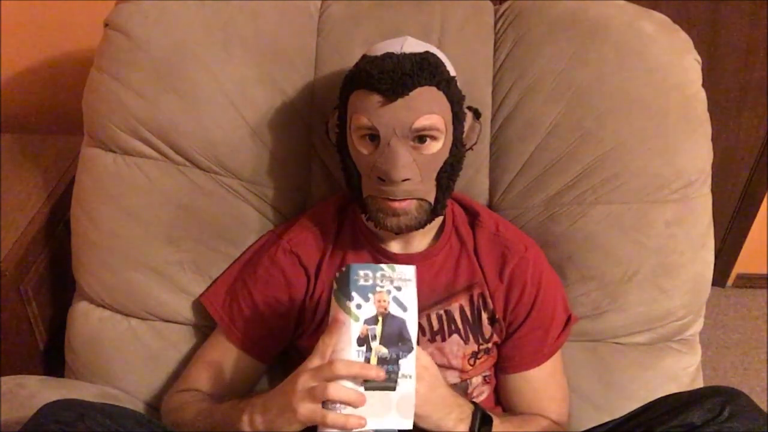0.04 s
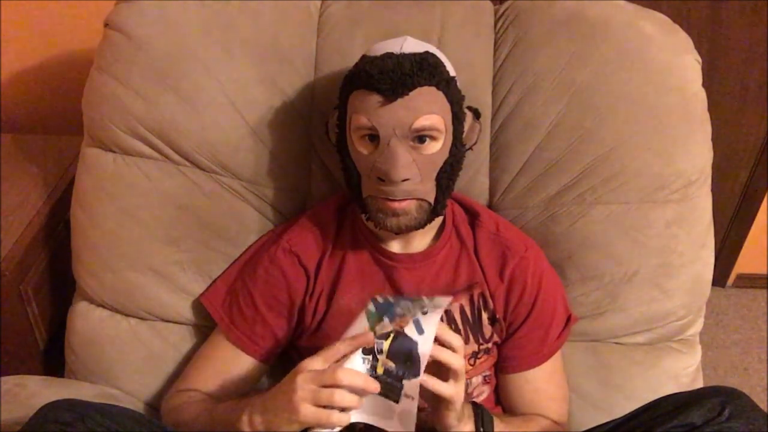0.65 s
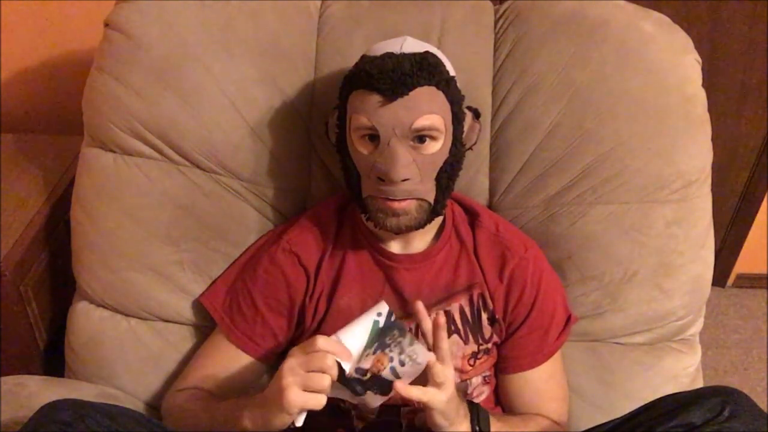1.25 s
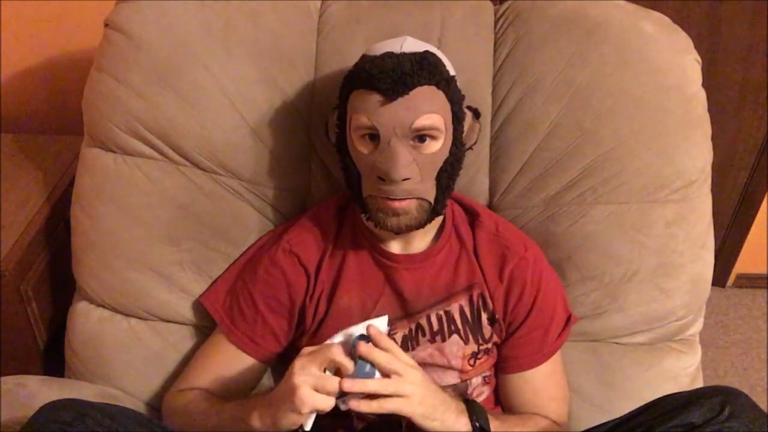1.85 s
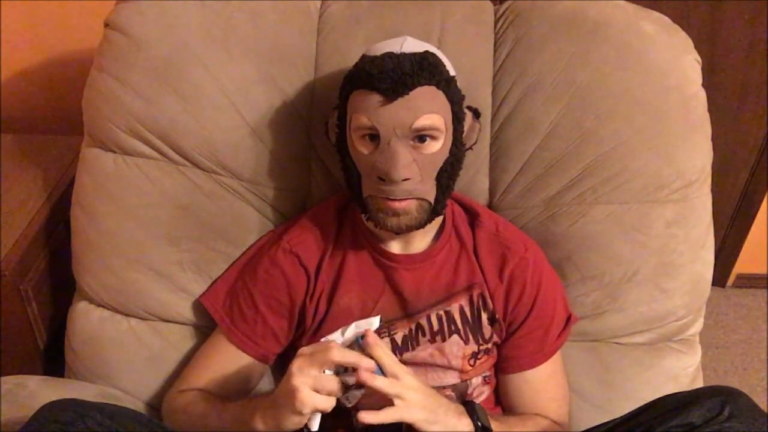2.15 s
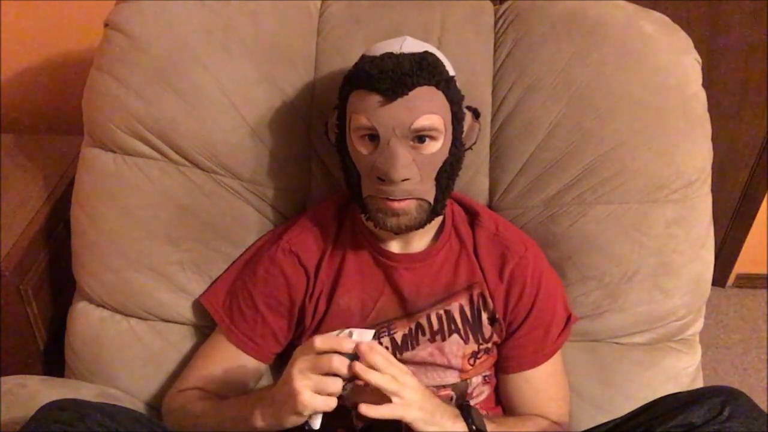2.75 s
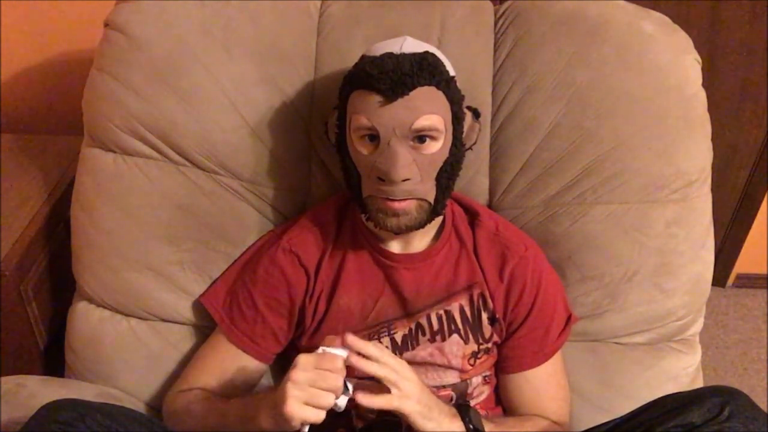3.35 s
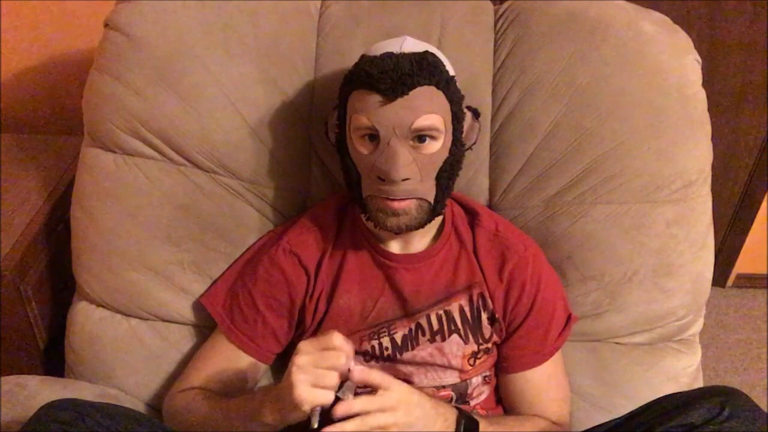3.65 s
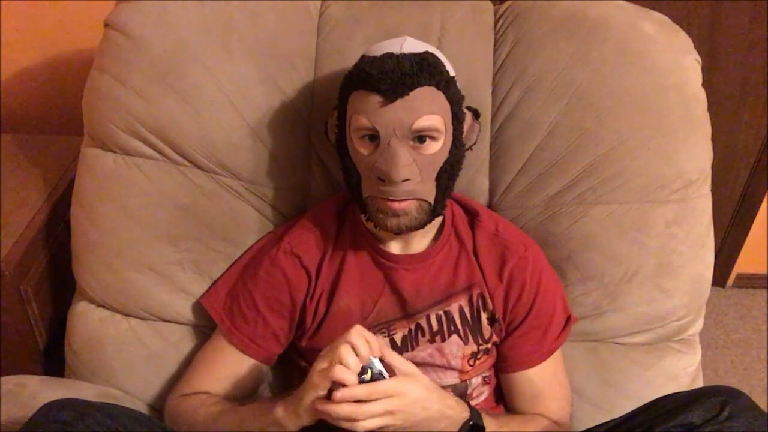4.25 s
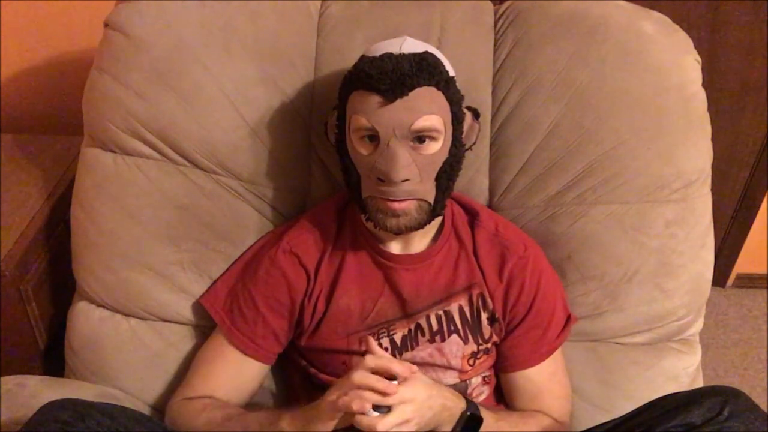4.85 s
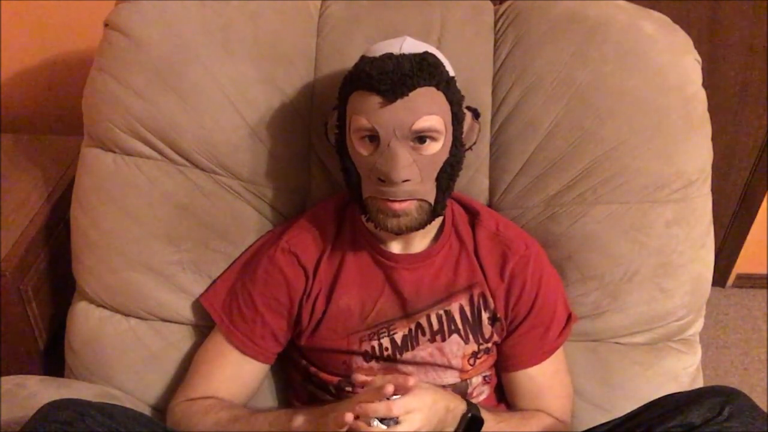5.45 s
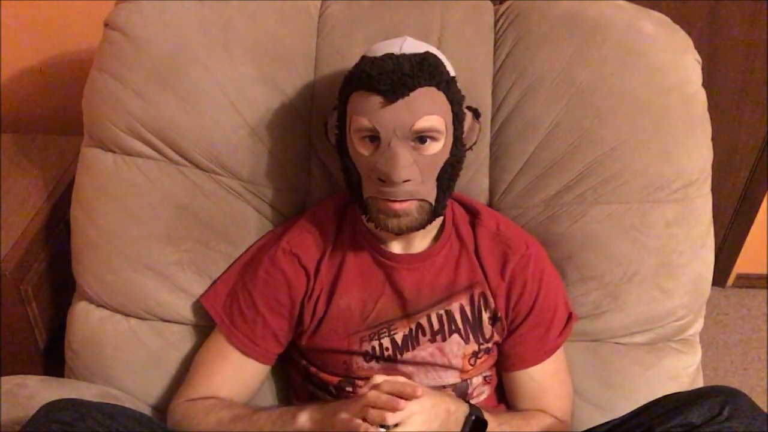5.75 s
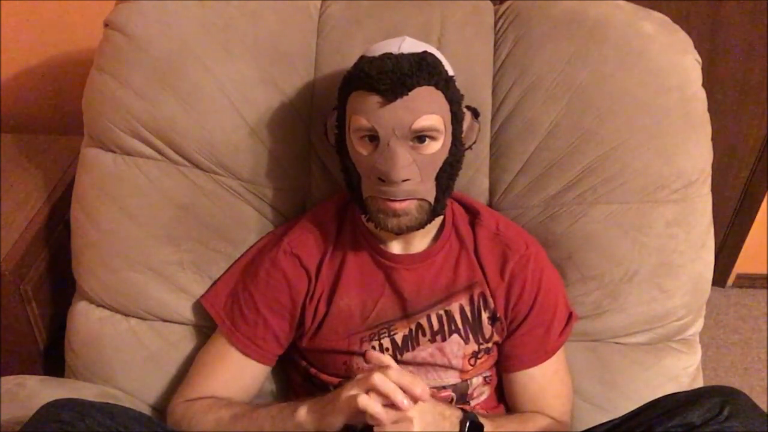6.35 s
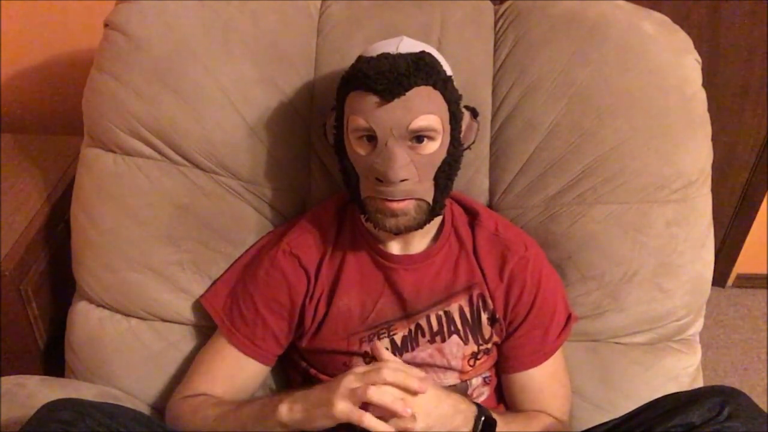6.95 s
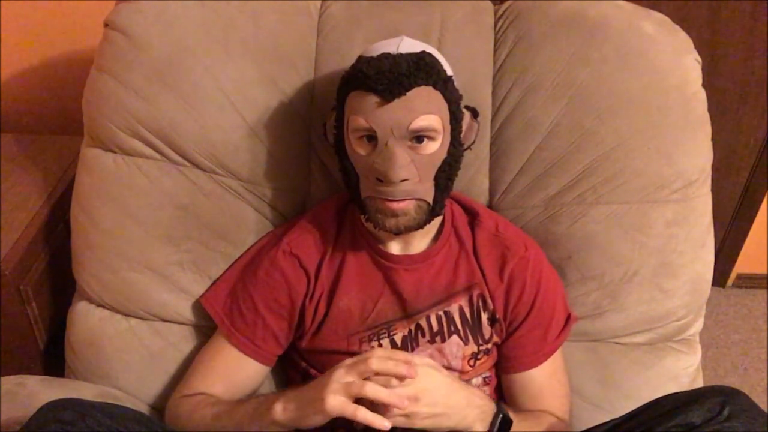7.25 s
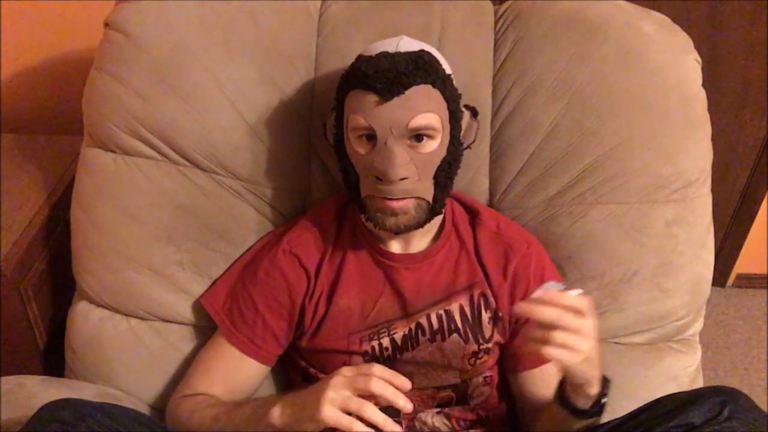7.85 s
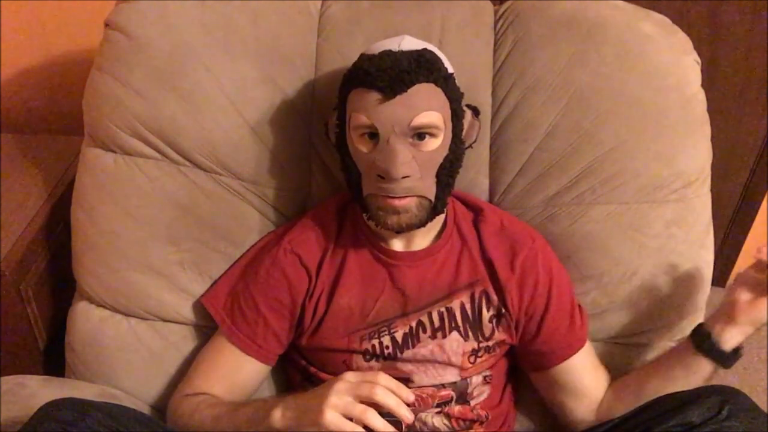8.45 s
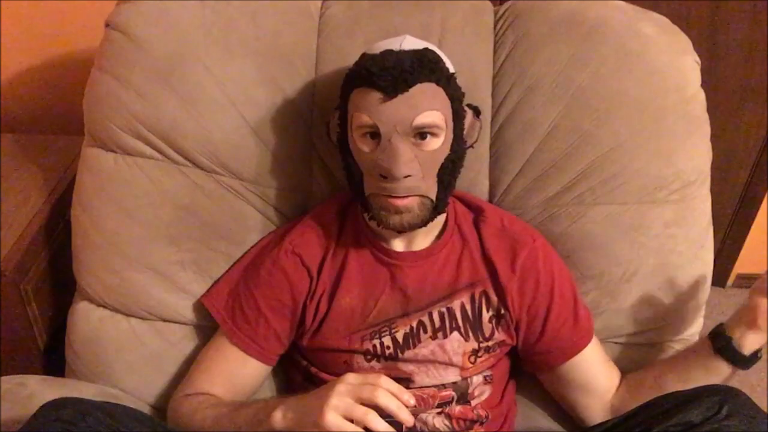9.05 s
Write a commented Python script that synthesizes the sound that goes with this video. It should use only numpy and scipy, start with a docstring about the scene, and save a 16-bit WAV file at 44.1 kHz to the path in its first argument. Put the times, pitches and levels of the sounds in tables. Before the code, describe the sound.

Hands start folding a stiff paper leaflet close by in a small, quiet room, with a few light snaps and soft rubbing in the first second. From about 1 to 3 seconds the crumpling is densest and loudest: sharp, irregular cracks, small low pops, scrapes and crinkling rustle, arriving squeeze after squeeze. The sound grows thinner as the wad tightens, easing around 4 seconds, with another cluster of crisp snaps and dry creaks from 4.5 to 5.7 seconds. From 6 to 7.5 seconds there are only faint squeezes and ticks, followed by a few barely audible paper touches. At about 9 seconds the tossed ball lands on furniture with a short, hollow knock and a slight crunch. Faint room air and a low electrical hum continue throughout, with a few very soft thuds of someone shifting in a seat.

```python
"""In a small living room, hands fold a stiff paper leaflet and crush it into a ball.
Squeeze after squeeze, creases snap and ring the flat patches beside them, and the paper scrapes
and rustles. As the wad tightens it loses its low notes and creaks. The ball is tossed aside and
lands on furniture with a hollow knock. Under it all lie room air, a faint mains hum and a few
soft thuds as the seated person shifts."""
import sys
import numpy as np
from scipy import signal
from scipy.fft import rfft, irfft, next_fast_len
from scipy.io import wavfile
from scipy.ndimage import uniform_filter1d, map_coordinates

SR = 44100
rng = np.random.default_rng(int(sys.argv[2]) if len(sys.argv) > 2 else 0)


def persist_wave(psi):
    """Save psi, clipped to +-1, as 16-bit WAV."""
    counts = np.round(np.clip(psi, -1, 1) * 32767).astype(np.int16)
    wavfile.write(sys.argv[1], SR, np.atleast_2d(counts).T)


N = 406161

# creases giving way: start_s, level_db, wide_patch_hz, narrow_patch_hz, bass_db, treble_db, ring_s
CREASE_SNAPS = [(0.109, -46.0, 690, 1560, 15, -23, 0.1), (0.2491, -39.5, 816, 1230, 1, -15, 0.059),
                (0.2746, -42.5, 990, 1263, -7, -29, 0.022), (0.461, -44.5, 1660, 2040, 17, 6, 0.036),
                (0.7842, -34, 1440, 2670, 11.5, 11, 0.029), (0.8737, -41.5, 1210, 3850, 9.5, -20, 0.049),
                (1.122, -28.0, 1070, 1240, -7, 10.5, 0.0077), (1.1843, -33.5, 1350, 1900, 1, 0, 0.03),
                (1.23, -35.5, 905, 1330, -5, 13, 0.0066), (1.2446, -27, 527, 1410, -1.5, 4, 0.031),
                (1.2482, -31.5, 3850, 6900, -0.5, 1, 0.026), (1.287, -43.5, 1400, 1930, -12, 16, 0.022),
                (1.3553, -36, 1426, 4350, -4, -9, 0.009), (1.418, -45.5, 1480, 2640, -3, 0, 0.0087),
                (1.4371, -30.5, 3820, 4970, 5, 17.5, 0.0068), (1.459, -41.5, 1560, 2600, 4, 10, 0.011),
                (1.4728, -36.5, 1240, 2200, -8, -26, 0.0038), (1.5647, -41.0, 576, 2120, 0, -7, 0.041),
                (1.7441, -36, 2290, 2930, 19.5, -4, 0.03), (1.7724, -41, 880, 2810, 9, -7, 0.014),
                (1.7936, -38, 2940, 3500, -13, 4, 0.015), (1.8178, -37.5, 2660, 5700, 0, 16, 0.013),
                (1.8504, -28.5, 650, 2940, -4.5, 4, 0.0048), (1.9642, -37.5, 970, 1200, 1, 2, 0.013),
                (1.9814, -32, 1820, 2650, 19.5, 13.5, 0.019), (2.0545, -37, 2780, 3800, -18, -2, 0.013),
                (2.159, -33, 665, 1210, -15, 0.5, 0.01), (2.3251, -37.5, 1460, 2180, 9, 15, 0.038),
                (2.5298, -34, 3750, 5440, -22, 12, 0.0075), (2.7573, -36.5, 764, 980, -3, 0, 0.014),
                (3.0028, -41, 1180, 1270, -16, -26, 0.029), (3.1848, -38.5, 1460, 1560, -14, 5.5, 0.013),
                (3.3597, -39, 1600, 2340, -4, -4, 0.019), (3.4844, -40, 4200, 4200, -17, -1, 0.014),
                (3.5488, -47.5, 1040, 1400, -9, -30, 0.0062), (3.722, -47.5, 1490, 3860, -2, 4, 0.041),
                (4.0112, -49, 824, 4280, -1, 11, 0.082), (4.114, -47, 586, 1090, 5, 10, 0.08),
                (4.3185, -50.5, 1240, 2960, 16, 18, 0.004), (4.5179, -32.5, 776, 1200, 0, 3, 0.015),
                (4.701, -30, 1040, 3080, 0, 4, 0.0028), (4.789, -43.5, 2400, 3020, -21, 16, 0.024),
                (4.814, -39.5, 1470, 2160, -40, -3, 0.093), (4.895, -45, 1560, 4320, -8, -7, 0.0081),
                (5.019, -38, 1060, 1560, -14, 3.5, 0.034), (5.095, -37.5, 1240, 1620, -1.5, 2, 0.014),
                (5.45, -47.5, 565, 3180, -7, -13, 0.0095), (5.6117, -40, 3370, 7140, -11.5, -10, 0.0088),
                (6.0585, -58.5, 1940, 3640, -12, -14, 0.01), (6.299, -61, 2240, 3880, 10, 5, 0.03),
                (7.055, -55, 1020, 1820, -11, 14, 0.011), (7.38, -58, 1060, 1730, -7.5, -33, 0.017),
                (8.1804, -59.5, 1940, 3220, 2, 2.5, 0.012)]
# the tone of the sheet when it snaps or ticks: pitch_hz, level_db
SHEET_TONE = [(80, -30.5), (150, -30.5), (250, -24), (450, -13.5), (630, -9), (800, -13), (1130, -6.5),
              (1600, -3), (2860, -7), (4540, -11.5), (6440, -16), (10240, -31.5), (14500, -40)]
# the tone of rubbed paper: pitch_hz, level_db
RUB_TONE = [(88, -41.5), (170, -17.5), (361, -10.5), (494, -11), (624, -6.5), (830, -7), (1450, -6),
            (1940, -8), (4200, -7.5), (4950, -12.5), (6000, -12.5), (10200, -29), (13700, -30),
            (16000, -39.5)]


def snaps(patch_db=8.5, patch_octaves=0.18, flip_s=0.0011, click_db=-3, aftershock_db=-12):
    """A crease flips in a quick stutter, and the two flat patches beside it ring briefly."""
    out, t = np.zeros(N), np.arange(SR // 12) / SR
    for start_s, level_db, wide_hz, narrow_hz, bass_db, treble_db, ring_s in CREASE_SNAPS:
        fade = amp(-60 * np.maximum(t - flip_s, 0) / max(ring_s, .004))
        # waves scatter between the creases and fill every pitch about evenly
        spectrum = rfft(fade * rng.standard_normal(len(t)))
        burst = irfft(spectrum / abs(spectrum + 1e-9) ** .5, len(t)) * fade ** .25
        peaks = uneven_peaks()

        def tone_db(hz):
            patches = bump(hz, wide_hz, patch_octaves) + bump(hz, narrow_hz, patch_octaves)
            bass = (1 - above(hz, 1100)) * above(hz, 190)
            sheet = along(SHEET_TONE, hz) + along(peaks, hz)
            return sheet + patch_db * patches + bass_db * bass + treble_db * treble(hz)

        # the shorter the snap, the more of it is one clean click
        click = amp(click_db) * np.linalg.norm(burst) * min(1, 0.0042 / ring_s)
        burst[round(flip_s * SR / 2)] += click
        burst += amp(aftershock_db) * np.linalg.norm(burst) * aftershocks(t)
        snap = coloured(burst, tone_db)
        add(out, start_s, amp(level_db) * snap * np.sqrt(SR // 100) / np.linalg.norm(snap))
    return out


def aftershocks(t, count=7):
    """Smaller cracks follow a snap as the sheet settles."""
    age_s = t - rng.uniform(.007, .05, (count, 1))
    cracks = rng.uniform(.3, 1, (count, 1)) * (age_s > 0) * np.exp(-abs(age_s) / .0007)
    run = cracks.sum(0) * rng.standard_normal(len(t))
    return run / np.linalg.norm(run)


def pops(pop_db=-19, pop_hz=215, ring_s=0.065):
    """While the sheet is still flat, a snap with low notes flips a wide panel with a low pop."""
    out, t = np.zeros(N), np.arange(SR // 8) / SR
    flat = 1 - tightness()
    for start_s, level_db, _, _, bass_db, *_ in CREASE_SNAPS:
        flap = amp(-60 * t / ring_s) * rng.standard_normal(len(t))
        pop = coloured(flap, lambda hz: 40 * np.log10(bump(hz, pop_hz, .8)))
        gain = amp(level_db + pop_db + min(bass_db, 0)) * flat[round(start_s * SR)] ** 3
        add(out, start_s, gain * pop * np.sqrt(SR // 100) / np.linalg.norm(pop))
    return out


def rustle(bend_db=-8, middle_db=-1, hiss_db=2.5, gloss_db=-11, buckle_db=-70):
    """Rubbed paper crinkles; its wide glossy panels bend and hiss until they are wadded up."""
    rub_level, hiss_level = hand_effort()
    flat = (1 - tightness()) ** .45
    # a flat sheet or a light touch slides smoothly; a creased one under pressure crinkles and catches
    force = np.clip(np.log10(rub_level / amp(buckle_db)) * 2, .15, 1)
    rough = force * np.interp(tightness(), [0, 1], [.45, .95])
    grains = crinkle() * rough * .65
    grip = amp((.4 + rough) * wobble(30)) * (1 + rough ** 2 * catches() / 2)

    def rubbed(grit, band):
        friction = (grit + rng.standard_normal(N)) * grip
        return unit(filtered(friction, lambda hz: amp(along(RUB_TONE, hz)) * band(hz)))

    bend = rubbed(grains, lambda hz: (1 - above(hz, 700)) ** 2)
    middle = rubbed(grains, lambda hz: above(hz, 850) - above(hz, 3500))
    hiss = rubbed(grains / 2 + rough * fibre_cracks() / 4, lambda hz: above(hz, 3500))
    gloss = rubbed(fibre_cracks() / 4, lambda hz: above(hz, 11000) ** 2)
    lows = amp(bend_db) * flat * bend + amp(middle_db) * middle
    highs = amp(hiss_db) * hiss + amp(gloss_db) * flat * gloss
    return panel_ring(rub_level * lows + hiss_level * highs)


def hand_effort(light_hiss_db=-7):
    """Light rubbing and squeezes add up to two loudness curves: the rustle and its hiss."""
    # the fingers never quite leave the paper: time_s, level_db
    light_rubbing = [(0, -60), (0.1, -61), (0.45, -54), (0.95, -56), (1.098, -54), (1.6, -53), (2.25, -58),
                     (2.389, -63.5), (2.499, -51), (2.72, -61.5), (3.951, -60.5), (4.4, -55.5),
                     (5.15, -62.5), (5.38, -65.5), (5.75, -67), (6.0, -74), (6.7, -76), (8.9, -76.5)]
    # separate squeezes of the hands: start_s, length_s, level_db, extra_hiss_db
    squeezes = [(0.467, 0.26, -55, -1.5), (0.787, 0.03, -52, -12), (0.965, 0.14, -62.5, 2.5),
                (1.109, 0.19, -50.5, -2.5), (1.396, 0.039, -56, -3), (1.709, 0.29, -50.5, -6.5),
                (2.043, 0.33, -54, -6.5), (2.509, 0.14, -52, -1.5), (2.732, 0.26, -54, -10.5),
                (2.981, 0.23, -49, -7), (3.38, 0.21, -64.5, -3), (3.688, 0.055, -62.5, 0.5),
                (4.357, 0.044, -48.5, -13), (4.526, 0.1, -52, -9.5), (4.674, 0.049, -53.5, -16),
                (4.774, 0.11, -61, 3.5), (4.989, 0.15, -55, -9), (5.417, 0.071, -59.5, -10),
                (5.598, 0.064, -60.5, -19), (5.69, 0.14, -62.5, -24), (6.024, 0.14, -69, -10),
                (6.163, 0.28, -71.5, -11), (6.869, 0.11, -69, -4), (6.991, 0.07, -60.5, -7.5),
                (7.092, 0.13, -65, -7.5), (7.266, 0.099, -64, -8.5), (8.147, 0.16, -80.5, 0),
                (8.572, 0.035, -71, -1.5)]
    rub_db = np.interp(np.arange(N) / SR, *np.transpose(light_rubbing))
    rub_power, hiss_power = amp(rub_db) ** 2, amp(rub_db + light_hiss_db) ** 2
    for start_s, length_s, level_db, extra_hiss_db in squeezes:
        power = squeeze(start_s, length_s)
        rub_power += amp(level_db) ** 2 * power
        hiss_power += amp(level_db + extra_hiss_db) ** 2 * power
    return np.sqrt(rub_power), np.sqrt(hiss_power)


def squeeze(start_s, length_s, grip_s=0.016, swell_db=0.5, release_db_per_s=233):
    """The power of one squeeze over time: take hold, press a little harder, let go."""
    t = np.arange(N) / SR - start_s
    press_db = swell_db * (np.clip(t / max(length_s, .01), 0, 1) - .5)
    release_db = release_db_per_s * np.maximum(t - length_s, 0)
    return (np.clip(t / grip_s, 0, 1) * amp(press_db - release_db)) ** 2


def crinkle(count=5200, fade_s=.0009):
    """Thousands of tiny buckles each ring at their own pitch, part tone and part splintering noise."""
    t = np.arange(SR // 150) / SR
    starts = rng.integers(0, N, (count, 1))
    pitch_hz = np.clip(2200 * np.exp(.7 * rng.standard_normal((count, 1))), 500, 12000)
    size = amp(4.3 * np.minimum(rng.exponential(size=(count, 1)), 3))
    rings = np.sin(2 * np.pi * pitch_hz * t) + rng.standard_normal((count, len(t)))
    return scattered(starts, size * np.exp(-t / fade_s) * rings)


def fibre_cracks(count=260, fade_s=.0006):
    """Single fibres break now and then with a bright crack."""
    t = np.arange(SR // 300) / SR
    starts = rng.integers(0, N, (count, 1))
    fades = rng.uniform(.4, 1, (count, 1)) * np.exp(-t / fade_s)
    return scattered(starts, fades * rng.standard_normal((count, len(t))))


def catches(count=170, rise_s=.0025):
    """The paper catches and slips free, so the loudness jumps for a few milliseconds at a time."""
    age = np.arange(SR // 30) / SR / rise_s
    jumps = np.bincount(rng.integers(0, N, count), rng.uniform(.2, 1, count), N)
    return signal.fftconvolve(jumps, age * np.exp(1 - age))[:N]


def panel_ring(sound, peak_db=6, level_db=-3):
    """The rubbed panel of paper rings at a pitch that moves with the grip."""
    # the main ring of the panel under the fingers: time_s, pitch_hz
    panel_pitch = [(0.3, 1130), (0.62, 2440), (1.0, 2370), (1.35, 1490), (1.85, 2540), (2.25, 2460),
                   (2.62, 1440), (2.85, 2570), (3.1, 1510), (3.58, 1590), (4.05, 5430), (4.3, 1280),
                   (4.55, 2360), (4.84, 3060), (5.02, 1750), (6.2, 2060), (7.05, 1660)]
    hz, t, spectra = signal.stft(sound, SR, nperseg=256)
    ring = bump(hz[:, None], np.interp(t, *np.transpose(panel_pitch)), octaves=.22)
    return signal.istft(spectra * amp(level_db + peak_db * ring), SR, nperseg=256)[1][:N]


def scrapes(ring_db=7):
    """A fold lets go and slides in a short run of tiny slips."""
    # paper sliding on paper: start_s, level_db, pitch_hz, treble_db, length_s
    slides = [(0.152, -56, 1960, 3.5, 0.026), (0.25, -42, 1140, -23.5, 0.036),
              (0.842, -47, 1250, 0.5, 0.036), (1.096, -38.5, 2600, 3.5, 0.0072),
              (1.251, -42, 1850, 5.5, 0.028), (1.857, -35, 2990, 32.5, 0.0091),
              (2.266, -44.5, 2540, 12, 0.033), (2.333, -42.5, 2660, 12, 0.023),
              (3.451, -50, 5600, 10.5, 0.014), (3.804, -43, 2250, 7, 0.04),
              (4.276, -56.5, 4470, 12.5, 0.006), (4.406, -46, 2050, 10.5, 0.018),
              (4.472, -52, 1640, 7.5, 0.0081), (4.803, -40.5, 2920, 7, 0.0098),
              (6.098, -61.5, 2070, 3, 0.053), (7.791, -67.5, 5600, 13, 0.016),
              (8.644, -63.5, 3000, 3.5, 0.022)]
    out, t = np.zeros(N), np.arange(SR // 8) / SR
    for start_s, level_db, pitch_hz, treble_db, length_s in slides:
        progress = t / max(length_s, .005)
        swell = (1 - np.exp(-20 * progress)) * np.exp(-progress ** 2)
        catching = amp(3 * unit(uniform_filter1d(rng.standard_normal(len(t)), size=80)))
        tone_db = lambda hz: (along(RUB_TONE, hz) + ring_db * bump(hz, pitch_hz, 0.2)
                              + treble_db * treble(hz))
        scrape = coloured(swell * catching * rng.standard_normal(len(t)), tone_db)
        add(out, start_s, amp(level_db) * scrape * np.linalg.norm(swell) / np.linalg.norm(scrape))
    return out


def creaks(ring_hz=2100, ring_db=5, tick_s=0.005, max_ticks=10):
    """Layers of the wad stick and slip, making dry ticks at a slightly uneven rate."""
    # runs of ticks in the tight wad: start_s, length_s, level_db, treble_db, ticks_per_s
    tick_runs = [(2.828, 0.14, -57, 9.5, 23), (4.981, 0.02, -55, -25, 78), (5.188, 0.13, -57, -35, 50),
                 (6.362, 0.07, -69, 0, 17), (6.437, 0.085, -65.5, -7, 54), (8.281, 0.01, -68, -15, 48)]
    out, t = np.zeros(N), np.arange(SR // 100) / SR
    for start_s, length_s, level_db, treble_db, ticks_per_s in tick_runs:
        times = np.cumsum(rng.uniform(.8, 1.2, max_ticks)) / ticks_per_s
        offsets_db = rng.standard_normal(max_ticks)
        noises = rng.standard_normal((max_ticks, len(t)))
        for after_s, offset_db, noise in zip(times - times[0], offsets_db, noises):
            peaks = uneven_peaks()
            if after_s < length_s:
                tone_db = lambda hz: (along(SHEET_TONE, hz) + along(peaks, hz)
                                      + ring_db * bump(hz, ring_hz, .5) + treble_db * treble(hz))
                tick = coloured(noise * amp(-60 * t / tick_s), tone_db)
                tick *= np.sqrt(len(t)) / np.linalg.norm(tick)
                add(out, start_s + after_s, amp(level_db + offset_db) * tick)
    return out


def uneven_peaks(depth_db=3, spacing_hz=210):
    """Each patch of creased paper favours its own pitches: rows of pitch_hz, level_db."""
    levels_db = depth_db * np.clip(rng.standard_normal(80), -2, 1)
    return np.column_stack([np.arange(80) * spacing_hz, levels_db])


def tightness():
    """How far the sheet is wadded at every sample, from 0 (flat) to 1 (a ball)."""
    # stages of the crushing: time_s, share_wadded
    stages = [(0, 0), (1.98, 0.34), (2.3, 0.5), (4.3, 0.68), (5.1, 1)]
    return np.interp(np.arange(N) / SR, *np.transpose(stages))


def wadded(sound, lowest_hz=540):
    """Small stiff patches carry no low notes: the tighter the wad, the thinner it sounds."""
    thin = signal.sosfilt(signal.butter(2, lowest_hz, "hp", fs=SR, output="sos"), sound)
    return sound + tightness() * (thin - sound)


def landing(rise_s=0.001, crunch_db=-4):
    """The ball knocks on furniture and crunches as it gives."""
    # the ball touches down and settles: start_s, level_db, fade_s
    touches = [(8.981, -38, 0.2), (8.991, -43, 0.22)]
    # the hollow ring of the furniture: pitch_hz, note_db, ring_s
    furniture_notes = [(314, -6.5, 0.11), (424, -10, 0.25)]
    # the tone of the ball and the furniture together: pitch_hz, level_db
    crunch_tone = [(53, -53), (90, -19), (170, -5.5), (330, 0), (630, -9.5), (1060, -15.5), (1390, -12.5),
                   (1960, -17), (2280, -13), (2800, -16.5), (4720, -22.5), (6370, -24), (15000, -41)]
    out, t = np.zeros(N), np.arange(SR // 6) / SR
    for start_s, level_db, fade_s in touches:
        for pitch_hz, note_db, ring_s in furniture_notes:
            ring = amp(level_db + note_db - 60 * t / ring_s) * np.sin(2 * np.pi * pitch_hz * t)
            add(out, start_s, ring)
        fade = amp(-60 * t / fade_s) * (1 - np.exp(-t / rise_s))
        crunch = coloured(fade * rng.standard_normal(len(t)), lambda hz: along(crunch_tone, hz))
        crunch *= np.linalg.norm(fade) / np.linalg.norm(crunch)
        add(out, start_s, amp(level_db + crunch_db) * crunch)
    return out


def room_echo(sound, near_db=-10, tail_db=-9, treble_db=-3, steps=24):
    """Nearby surfaces answer within milliseconds, then a soft tail; both change as the hands move."""
    # how long the room takes to fade by 60 dB: pitch_hz, fade_s
    fade_times = [(150, 0.27), (1500, 0.13), (5000, 0.14), (15000, 0.22)]
    out, hop = np.zeros(N), N // steps + 1
    for step in range(steps + 1):
        first = max(0, (step - 1) * hop)
        samples = np.arange(first, min(N, (step + 1) * hop))
        hz, t, noise = signal.stft(rng.standard_normal(SR // 2), SR, nperseg=256)
        fade = amp(treble_db * treble(hz)[:, None] - 60 * t / along(fade_times, hz)[:, None])
        echo = signal.istft(noise * fade * (1 - np.exp(-t / 0.00096)), SR, nperseg=256)[1]
        echo *= amp(tail_db) / np.linalg.norm(echo)
        delay = round(SR * 0.0036 * rng.uniform(0.74, 1.0))
        echo[delay] += amp(near_db)
        echo[2 * delay] += amp(near_db) / 2
        crossfade = 1 - abs(samples / hop - step)
        add(out, first / SR, signal.fftconvolve(sound[samples] * crossfade, echo))
    return out


def room_air(level_db=-72):
    """The air in the room makes a steady, low rush."""
    # the tone of the air: pitch_hz, level_db
    air_tone = [(12, -49.5), (20, -11.5), (91, -8.5), (123, -6), (150, -14.5), (177, -9), (228, -13.5),
                (620, -18.5), (1400, -25.5), (16000, -41)]
    return amp(level_db) * unit(filtered(rng.standard_normal(N), lambda hz: amp(along(air_tone, hz))))


def mains_hum(level_db=-78, pitch_hz=120):
    """Mains power hums on one low note whose level wavers."""
    note = unit(np.sin(2 * np.pi * pitch_hz * np.arange(N) / SR))
    return amp(level_db) * note * amp(2.5 * wobble(8))


def seat_thuds(pitch_hz=105, swell_s=0.14):
    """A low rumble swells softly each time the seated person shifts."""
    # shifts in the seat: peak_s, level_db
    shifts = [(0.9, -67.5), (2.1, -67.5), (3.32, -67.5), (4.38, -70), (5.96, -69), (6.8, -69.5)]
    t = np.arange(N) / SR
    rumble = unit(filtered(rng.standard_normal(N), lambda hz: bump(hz, pitch_hz, 0.9) ** 2))
    return rumble * sum(amp(db) * np.exp(-((t - peak_s) / swell_s) ** 2) for peak_s, db in shifts)


def amp(db):
    """Turn decibels into a number to multiply by."""
    return 10 ** (np.asarray(db) / 20)


def unit(sound):
    """Scale a sound to an average power of 1."""
    return sound / np.sqrt(np.mean(sound ** 2) + 1e-20)


def along(points, hz):
    """Read between rows of pitch_hz, value, with the pitches spaced by octaves."""
    pitches, values = np.transpose(points)
    return np.interp(np.log(hz + 1), np.log(pitches + 1), values)


def above(hz, edge_hz):
    """A smooth step from 0 to 1 around the edge."""
    return 1 - 1 / (1 + (hz / edge_hz) ** 4)


def bump(hz, centre_hz, octaves):
    """A rounded peak of height 1 around one pitch."""
    return 1 / (1 + (np.log2((hz + 1) / centre_hz) / octaves) ** 2)


def treble(hz):
    """A ramp from 0 at 2000 Hz to 1 at 12000 Hz."""
    return np.clip(np.log2((hz + 1) / 2000) / np.log2(6), 0, 1)


def wobble(points_per_s):
    """A smooth curve through random points."""
    points = rng.standard_normal(int(N * points_per_s / SR) + 4)
    return map_coordinates(points, [np.arange(N) * points_per_s / SR])


def filtered(sound, gain):
    """Turn each pitch in a sound up or down by gain(hz)."""
    size = next_fast_len(len(sound) + SR // 4)
    return irfft(rfft(sound, size) * gain(np.fft.rfftfreq(size, 1 / SR)), size)[:len(sound)]


def coloured(sound, tone_db, size=8192):
    """Give a short sound the tone curve tone_db(hz)."""
    cepstrum = irfft(np.log(amp(tone_db(np.fft.rfftfreq(size, 1 / SR))) + 1e-6))
    # keeping only the first half makes the ringing follow the sound, never lead it
    cepstrum[1:size // 2] *= 2
    cepstrum[size // 2 + 1:] = 0
    return irfft(rfft(sound, size) * np.exp(rfft(cepstrum)))


def add(track, start_s, sound):
    """Mix a sound into the track."""
    part = track[max(0, round(start_s * SR)):][:len(sound)]
    part += sound[:len(part)]


def scattered(starts, sounds):
    """Mix tiny sounds, each at its start sample, into a track with an average power of 1."""
    samples = starts + np.arange(sounds.shape[1])
    return unit(np.bincount(samples.ravel(), sounds.ravel(), N)[:N])


def scene():
    """The paper, its echo and the quiet room, in one channel."""
    paper = pops() + wadded(snaps() + scrapes() + rustle() + creaks()) + landing()
    return (paper + room_echo(paper) + room_air() + mains_hum() + seat_thuds())[None]


def record(dry, top_hz=16100):
    """Cut away the very highest treble."""
    return np.array([filtered(channel, lambda hz: hz < top_hz) for channel in dry])


dry = scene()
out = record(dry)
persist_wave(out)
```